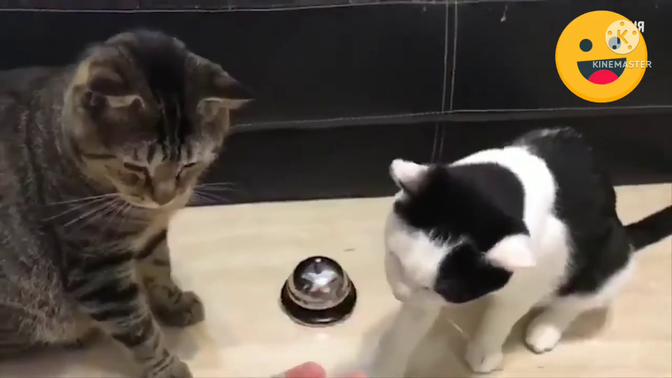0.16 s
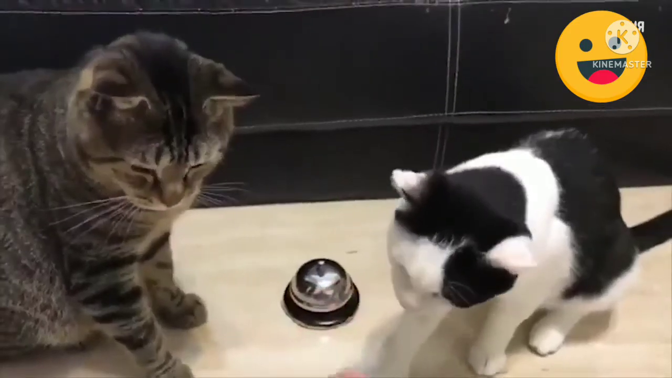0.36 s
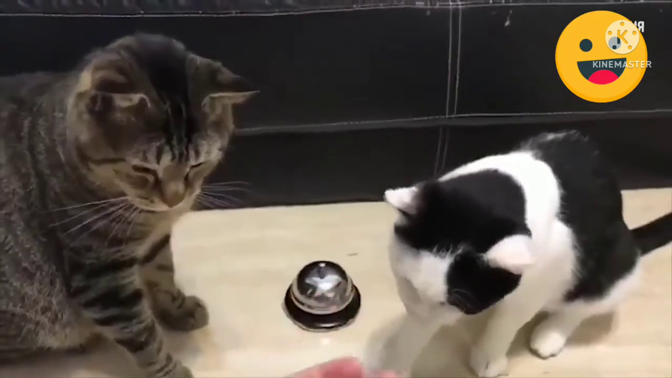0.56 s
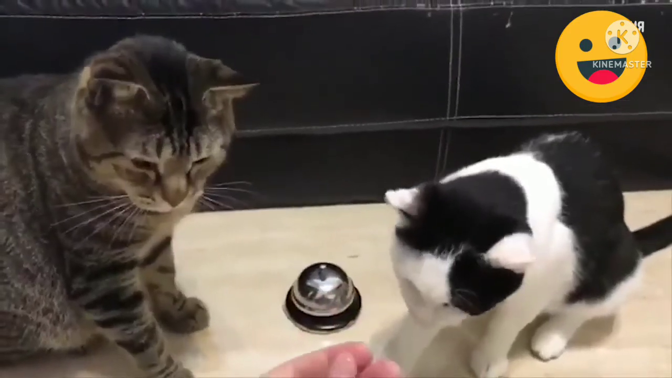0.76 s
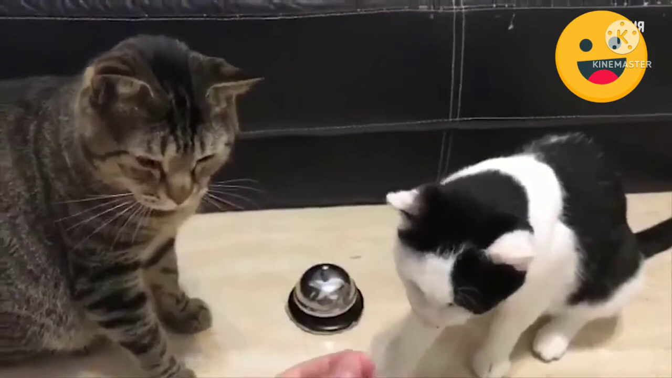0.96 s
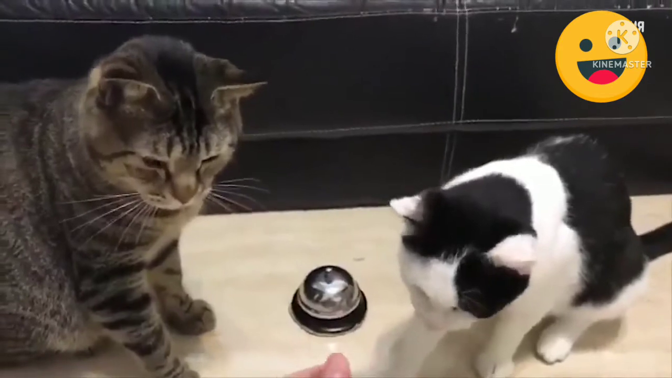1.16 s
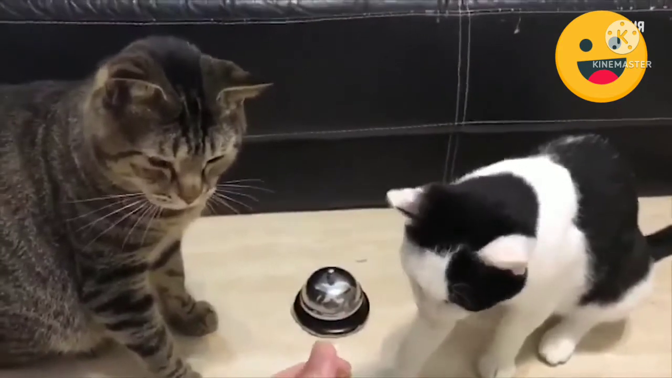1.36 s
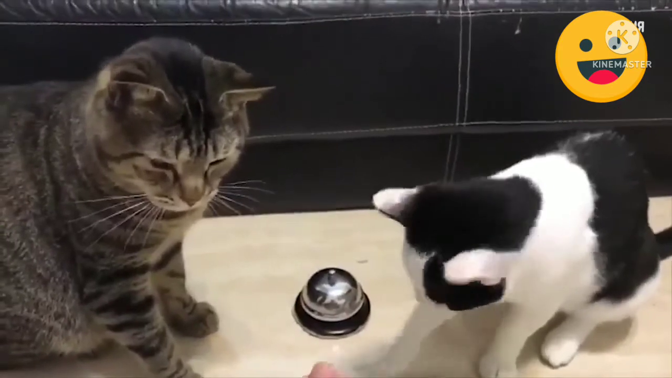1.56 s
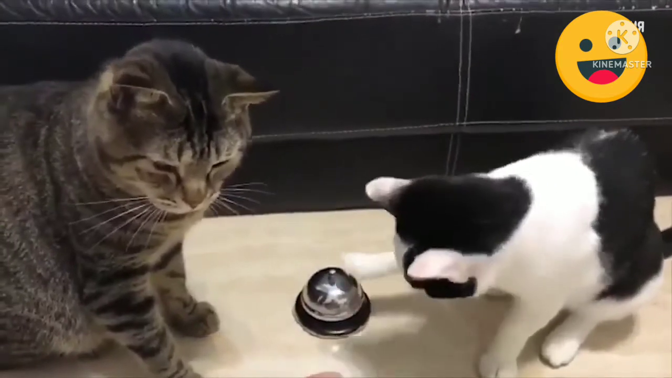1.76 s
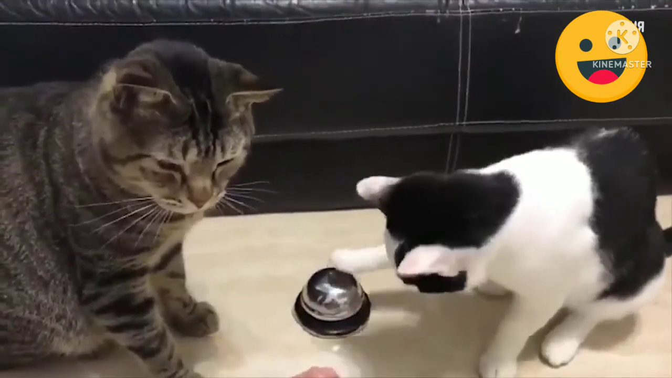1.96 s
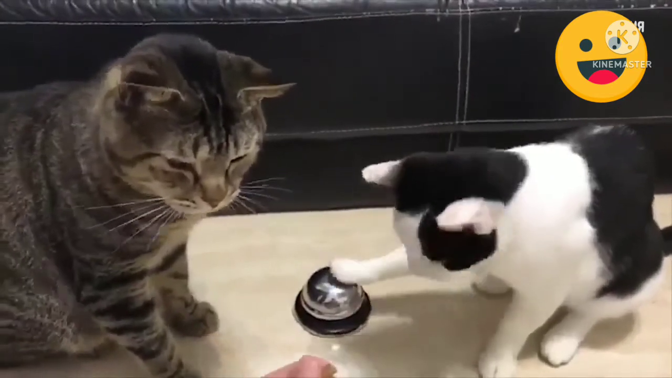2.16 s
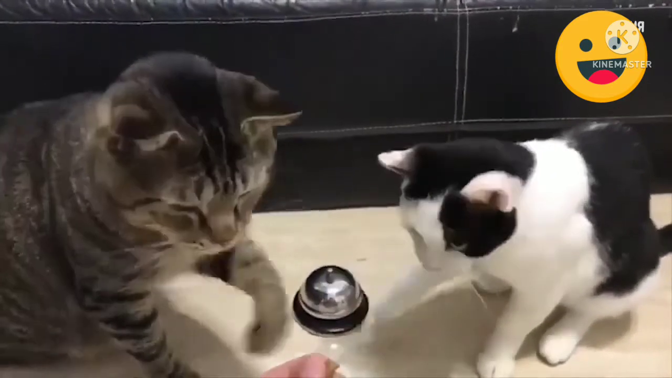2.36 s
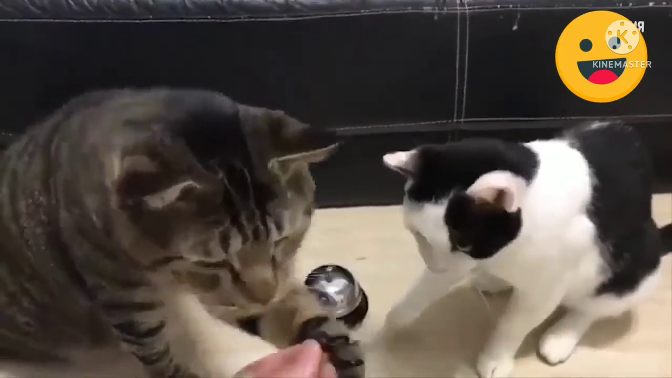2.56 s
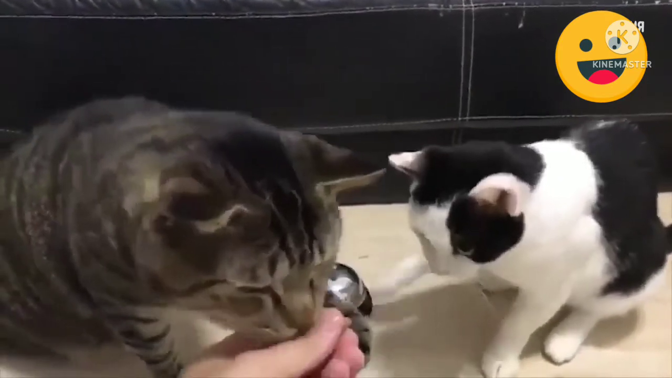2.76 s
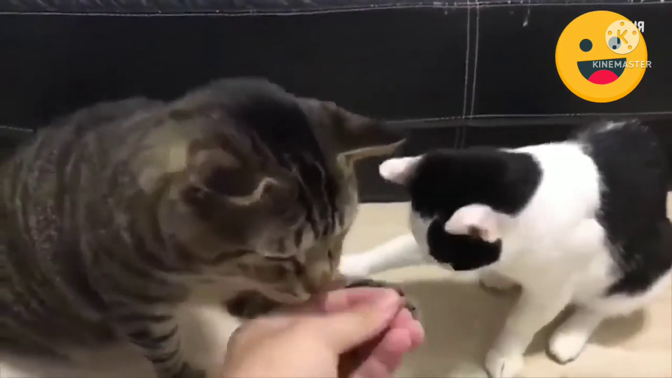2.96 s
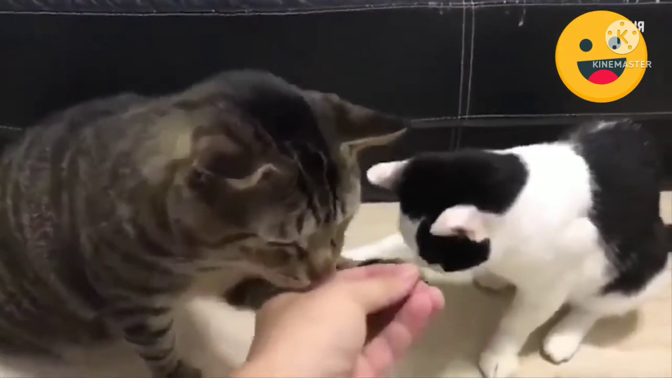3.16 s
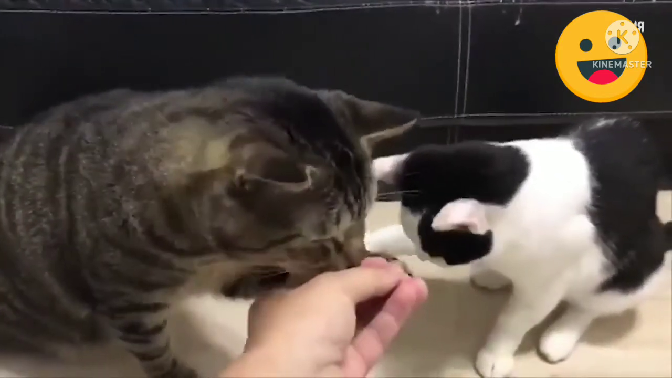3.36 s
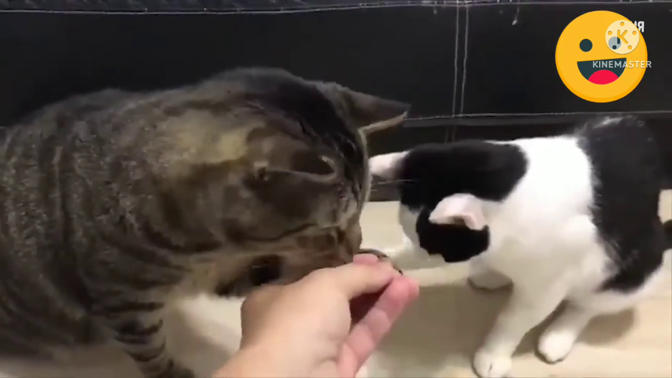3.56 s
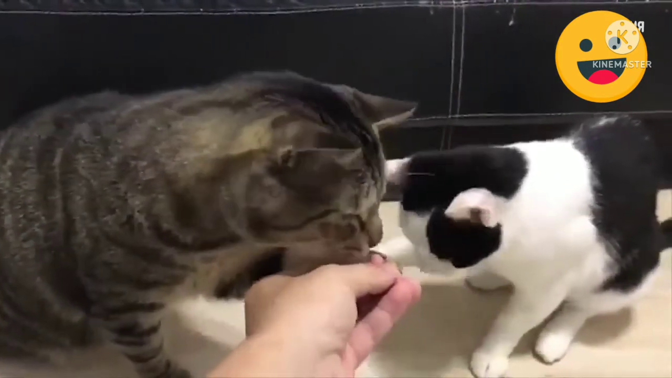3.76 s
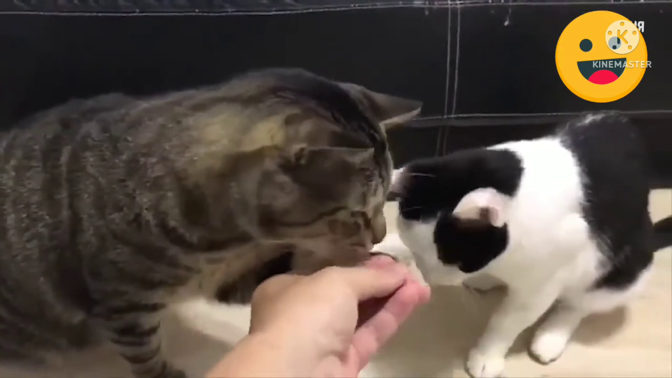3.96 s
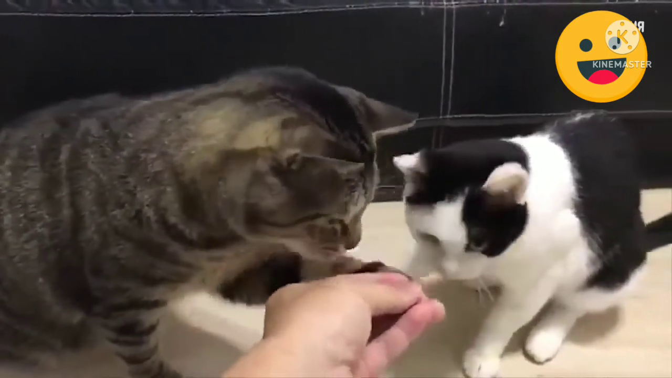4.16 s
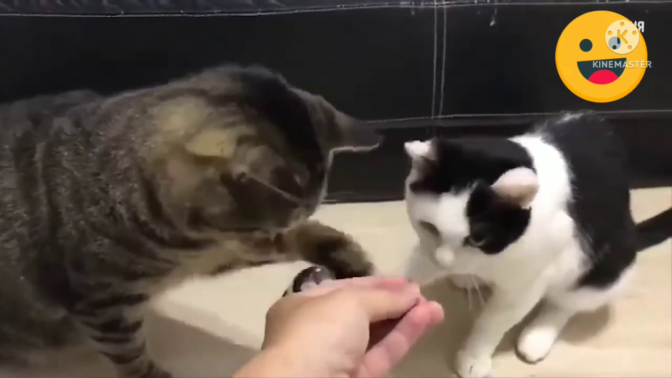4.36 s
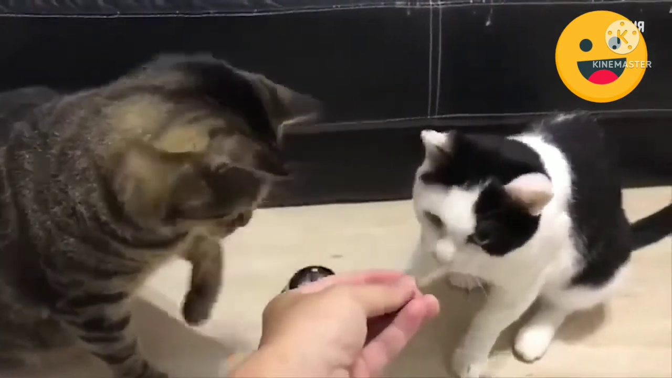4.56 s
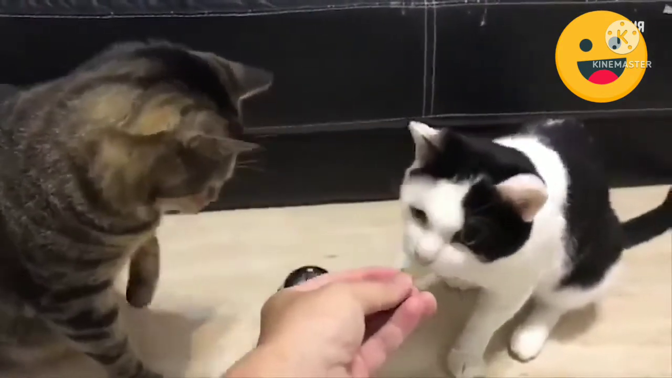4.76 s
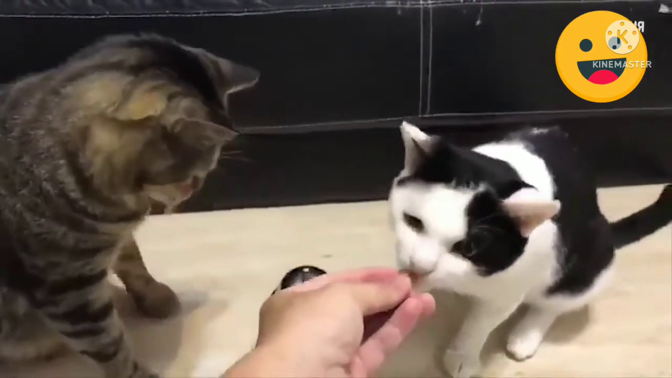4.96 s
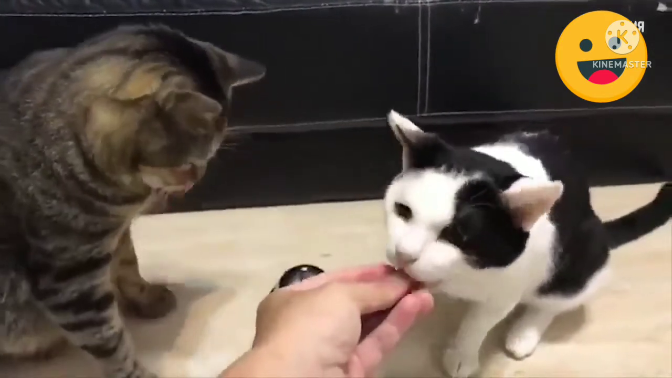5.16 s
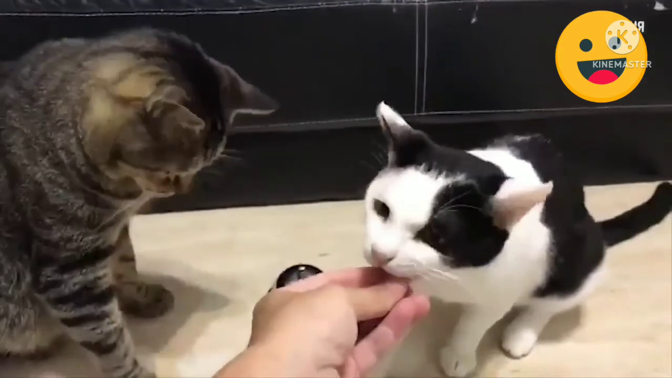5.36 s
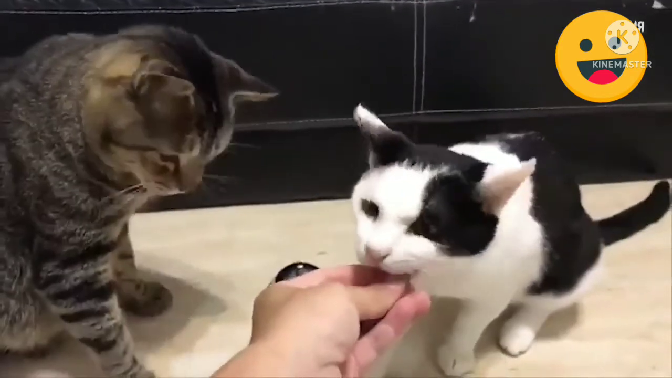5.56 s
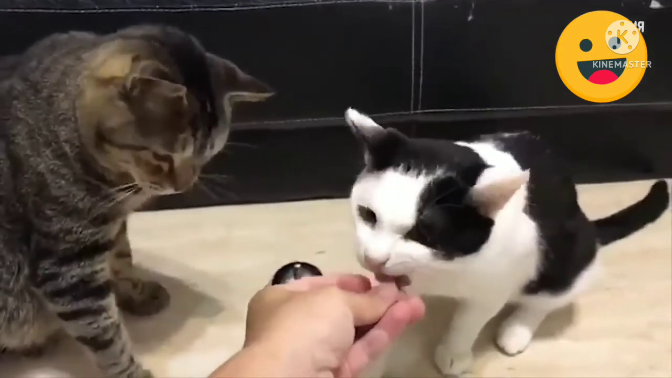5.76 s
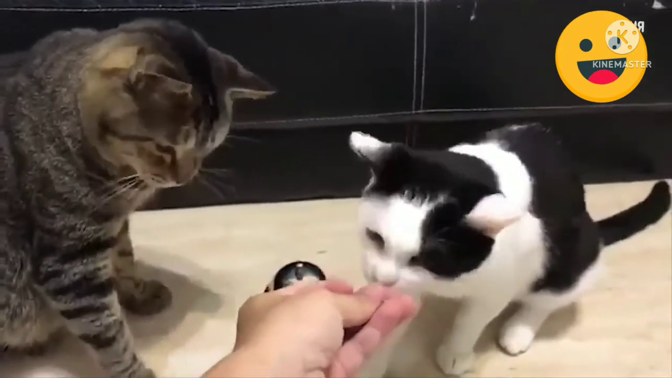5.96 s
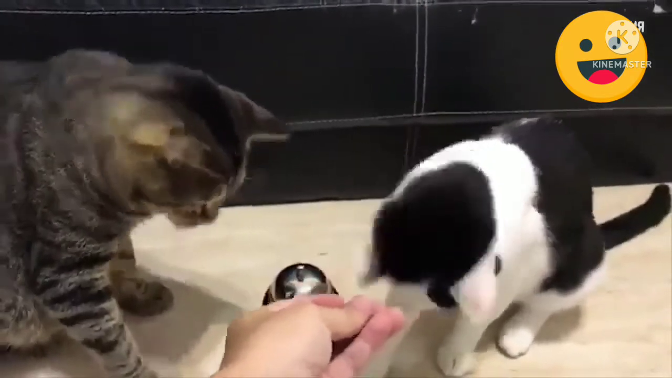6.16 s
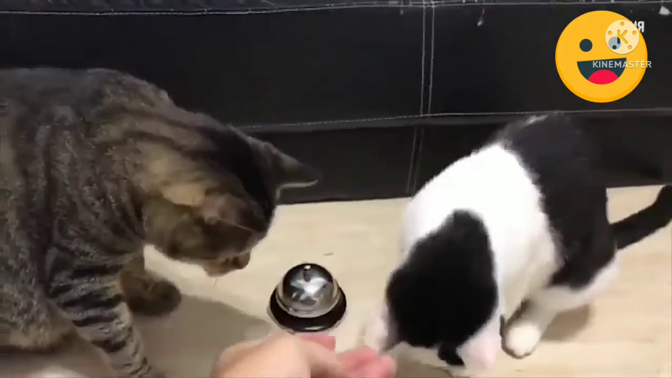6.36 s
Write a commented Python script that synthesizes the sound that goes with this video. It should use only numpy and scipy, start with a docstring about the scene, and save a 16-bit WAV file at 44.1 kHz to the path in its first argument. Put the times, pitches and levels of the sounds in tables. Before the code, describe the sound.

A small metal desk bell is struck three times in a quiet room, ringing brightly, with faint claw ticks and finally bouncing kibble.

```python
"""A steel desk bell on a wooden floor in a quiet room, pawed in turn by two cats: damped sine modes in close
pairs that beat. It hums from an earlier blow, then is struck three times, each with a noisy clank. Claws and
lips tick in short band-limited noise puffs, and the clapper touching the dome adds a few narrow, pitched ticks;
fur rustles as lumpy bright noise. At the end dry kibble bounces on the boards: noise crackles over short sine
thuds. Noise echoes form the room, shaped noise and thin tones its background."""
import sys
import numpy as np
from scipy import signal
from scipy.fft import rfft, irfft, next_fast_len
from scipy.io import wavfile
from scipy.ndimage import uniform_filter1d

SR = 44100
rng = np.random.default_rng(int(sys.argv[2]) if len(sys.argv) > 2 else 0)


def transcribe(signal):
    """Save signal, clipped to [-1, 1], as a 16-bit WAV file at the path in sys.argv[1]."""
    frames = np.atleast_2d(signal).T
    limited = np.clip(frames, -1, 1)
    pcm = np.round(limited * 32767).astype(np.int16)
    wavfile.write(sys.argv[1], SR, pcm)


def to_linear_factor(level_db):
    """Convert decibel levels (scalar or array-like) to linear amplitude factors."""
    exponent = np.asarray(level_db, float) / 20
    return 10 ** exponent


N = 286429  # samples


def rms_one(x):
    """Scale to rms 1."""
    return x / np.sqrt(np.mean(x ** 2) + 1e-20)


def coloured(spectrum, tilt_db_per_oct=0):
    """Noise of rms 1 with the given spectrum, tilted about 3 kHz."""
    hz, level_db = np.transpose(spectrum)
    size = next_fast_len(N, real=True)
    grid_hz = np.arange(size // 2 + 1) * SR / size + 1  # +1 keeps the log finite
    tilted_db = level_db + tilt_db_per_oct * np.log2(hz / 3000)
    grid_db = np.interp(np.log(grid_hz), np.log(hz), tilted_db)
    white = rfft(rng.standard_normal(size))
    return rms_one(irfft(white * to_linear_factor(grid_db), size)[:N])


def burst(start_s, hold_ms, t60_s):
    """Envelope: sudden start, short hold, exponential fall."""
    age_s = np.arange(N) / SR - start_s
    return (age_s >= 0) * to_linear_factor(-60 * np.clip(age_s - hold_ms / 1000, 0, 1) / t60_s)


# blows of the clapper: start_s, clank_db, tilt_db_per_oct,
# low_beat_turns, mid_beat_turns (where the beats of the 1.1 and 3 kHz pairs start)
BLOWS = [(2.058, -21.5, 0.5, 0.38, -.25), (3.17, -21, -0.4, .13, -0.31), (4.0331, -24.5, -0.1, -0.3, 0.54)]
# dome modes, the five longest first: mode_hz
MODE_HZ = [1122.6, 1161.5, 3018.7, 3041.7, 5607.8, 8785.5, 8791, 13187.5, 13183.5, 10622, 8095, 4474, 4190,
           9034, 9235, 9918, 11771, 12810, 13415, 12175, 12990, 14085, 8646, 10620, 13189]
# ring of each mode: t60_s, outset_db (still ringing), peak1_db, peak2_db, peak3_db (per blow)
MODE_RING = [(10, -65, -59, -59, -54.5), (9.9, -69.5, -57.5, -54.5, -59.5), (5.88, -78.5, -52, -41.5, -47),
             (4.98, -64, -38.5, -39.5, -44), (1.85, -87, -26, -24, -25.5), (0.63, -99, -24.5, -24.5, -27.5),
             (.25, -99, -29, -43.5, -52.5), (0.61, -99, -41.5, -43, -43), (.12, -99, -22, -42.5, -34),
             (0.38, -99, -44, -44.5, -43.5), (.07, -99, -62, -18.5, -57), (0.14, -99, -41.5, -45.5, -43.5),
             (.2, -99, -50, -47.5, -47), (0.12, -99, -39, -33, -41), (.12, -99, -37.5, -39, -31),
             (0.17, -99, -35, -47.5, -35.5), (0.14, -99, -32, -35, -50.5), (.11, -99, -41.5, -40.5, -45.5),
             (.08, -99, -38, -45.5, -39.5), (.07, -99, -42, -45.5, -51), (0.089, -99, -37.5, -42, -45),
             (0.0503, -99, -44.5, -39, -44), (.1, -99, -41.5, -42.5, -42.5), (1.1, -99, -65.5, -60, -70),
             (1.2, -99, -68.5, -63, -77)]
# level swells and dips of the first five modes as bodies move round the bell, one list per mode:
# centre_s, width_s, change_db
WAVERS = [
    [(2.2, .08, -2.5), (2.8, .1, -1.5), (3.4, .15, 3.5), (1.8, 0.074, -18), (3.8, 0.084, 7.5),
     (3.99, .1, -14), (4.15, 0.26, -10.5), (4.45, .3, -3.5), (5.2, 0.65, 2.5)],
    [(2.1, 0.15, -4), (2.5, 0.091, -1), (3.806, 0.72, 6.5), (4.9, .3, -2.5)],
    [(2.54, .18, 5.5), (4.6, .12, -4), (3.2, 0.11, -1), (3.6, .1, 2), (4.2, 0.23, 2)],
    [(2.12, 0.12, -3.5), (2.63, 0.092, -3.5), (3.2, 0.066, -15.5), (3.42, 0.078, -3), (3.6, 0.096, 3),
     (4.14, .15, -0.5), (3.9, 0.091, 4)],
    [(2.63, .15, -1.5), (3.1, 0.24, 5.5), (3.2, .1, -0.5), (3.7, 0.73, 3.5), (4.28, 0.29, -3.5),
     (4.97, 0.18, -3.5)],
]


def dome(rise_cycles):
    """Every blow restarts each mode; the sound builds over some cycles as first echoes arrive."""
    outset = (0, 0.41, 0.41)  # start_s, low_beat_turns, mid_beat_turns of the ring already going
    blows = [(start_s, *beat_turns) for start_s, _, _, *beat_turns in BLOWS]
    starts_s, low_beat_turns, mid_beat_turns = np.transpose([outset] + blows)
    t_s, out = np.arange(N) / SR, np.zeros(N)
    blow = np.clip(np.searchsorted(starts_s, t_s, side="right") - 1, 0, None)
    age_s = t_s - starts_s[blow]
    # the lower mode of a pair lags
    lag_turns = {MODE_HZ[0]: low_beat_turns[blow], MODE_HZ[2]: mid_beat_turns[blow]}
    wavers = dict(zip(MODE_HZ, WAVERS))
    for hz, (t60_s, *peak_db) in zip(MODE_HZ, MODE_RING):
        level_db = np.array(peak_db)[blow] - 60 * age_s / t60_s
        for centre_s, width_s, change_db in wavers.get(hz, []):
            level_db += change_db * np.exp(-(2 * (t_s - centre_s) / width_s) ** 2)
        if hz == MODE_HZ[5]:  # the 8.8 kHz mode throbs 8 times a second as it fades
            level_db += 2.1 * np.cos(2 * np.pi * 8.0 * (age_s - .03))
        rise = 1 - np.exp(-age_s * hz / rise_cycles) * (blow > 0)  # low modes speak later
        turns = hz * age_s - lag_turns.get(hz, 0)
        out += to_linear_factor(level_db) * rise * np.sin(2 * np.pi * turns)
    return out


# room noise spectrum: freq_hz, density_db (per Hz, relative)
HUSH = [(22, -35), (36, -4.5), (50, 7.5), (65, -0.5), (85, 3.5), (135, -7.5), (270, -6.5), (469, -17.5),
        (900, -14), (1140, -10), (1400, -17.5), (2210, -24.5), (3350, -26), (4930, -37.5), (11600, -48),
        (13800, -41), (15000, -49)]
# mains hum and faint thin tones: freq_hz, level_db
WHINES = [(51, -72), (8785, -90.5), (10622, -90), (13187, -98.5)]


def background():
    """Low rumble and air hiss as shaped noise, plus a few barely heard sine tones."""
    t_s = np.arange(N) / SR
    tones = sum(to_linear_factor(level_db) * np.sin(2 * np.pi * hz * t_s) for hz, level_db in WHINES)
    return to_linear_factor(-63.5) * coloured(HUSH) + tones


# fur and paws brushing: start_s, length_s, level_db
STROKES = [(0, 2.55, -81), (.6, .05, -86), (.93, .03, -76), (2.2, 0.2, -74.5), (2.417, 0.063, -68.5),
           (3.26, 0.26, -69.5), (3.39, .06, -63), (3.49, .08, -62.5), (4.97, 1.6, -82), (5.135, .04, -77),
           (5.25, .04, -76), (5.68, .07, -79)]


def stroke_level():
    """Each stroke fades in, holds and fades out; their powers add."""
    rise_db_per_s, fall_db_per_s = 302.5, 401
    t_s, power = np.arange(N) / SR, 0
    for start_s, length_s, level_db in STROKES:
        rise_db = rise_db_per_s * np.clip(start_s - t_s, 0, 1)
        fall_db = fall_db_per_s * np.clip(t_s - start_s - length_s, 0, 1)
        power = power + to_linear_factor(level_db - rise_db - fall_db) ** 2
    return np.sqrt(power)


# fur friction spectrum: freq_hz, density_db (per Hz, relative)
FUR = [(1500, -17), (3000, 0), (4500, -2), (5500, -4), (7000, -16), (8200, -1.5), (10000, -5), (12500, -9),
       (13800, -12.5), (14500, -32)]


def rustle(patchy_db):
    """Soft bright friction that comes in lumps: noise whose level wanders slowly in dB."""
    lumps = rms_one(uniform_filter1d(rng.standard_normal(N), size=600))
    return stroke_level() * to_linear_factor(patchy_db * lumps) * coloured(FUR)


def faint_ticks():
    """Lesser ticks at random times (start_s, peak_db, centre_hz, width_oct), kept while a stroke holds."""
    rate_per_s, loudest_db, spread_db = 2.9, -61, 6.0
    when, size, pitch = rng.random((60, 3)).T
    starts_s = np.cumsum(-np.log(1 - when)) / rate_per_s
    rows = []
    for start_s, z, p in zip(starts_s, size, pitch):
        moving = any(a_s < start_s < a_s + length_s for a_s, length_s, _ in STROKES)
        if moving and start_s < N / SR - .1:
            rows.append((start_s, loudest_db + spread_db * (z - 1), 2500 * 2 ** (1.5 * p), .9))
    return rows


# ticks that stand out, from claws and lips, plus a few narrow pitched ones where the clapper touches the dome
# after a blow (near 2.2, 3.4 and 4.4 s): start_s, peak_db, centre_hz, width_oct (raised to 0.1 if less)
TICKS = [(0.011, -48, 5150, 0.74), (0.2484, -44, 2600, 1.1), (.266, -53, 4500, 2),
         (0.3062, -34.5, 6450, 2.9), (0.313, -42, 7600, 0.8), (0.476, -51, 6400, 0.72),
         (0.5624, -55.5, 5560, 0.49), (0.779, -60, 5540, 0.47), (0.7892, -47, 2230, 0.65),
         (0.911, -57, 7000, 0.84), (1.2415, -54.5, 3000, 2.4), (1.473, -63, 4020, 1.6),
         (1.5914, -59, 2790, 0.54), (1.882, -59, 4230, 1.1), (1.943, -61, 4170, 1.1),
         (2.212, -50, 4440, 0.17), (2.213, -51.5, 1370, 0.67), (2.216, -32.5, 8770, 0.086),
         (2.449, -51.5, 345, 0.75), (3.379, -50.5, 4200, 0.34), (3.421, -36, 5560, 0.078),
         (3.507, -57, 4470, 0.26), (4.422, -60, 5500, 0.086), (5.151, -54, 7000, 0.83),
         (5.27, -51, 7460, 1.64), (5.7317, -51.5, 2386, 0.33), (5.744, -68, 3000, 0.9),
         (5.7603, -52, 2583, .9), (6.157, -55.5, 3750, .6)]


def ticks():
    """Each tick is a short puff of noise in one resonance."""
    out, age_s = np.zeros(N), np.arange(4096) / SR
    # the paw meets the plunger before each blow, the clapper knocks back after it
    press = [(start_s - .0074, db - 14.5, 4500, 1.8, 6.0) for start_s, db, *_ in BLOWS]
    rebound = [(start_s + .021, db - 12, 4270, .3, 12.0) for start_s, db, *_ in BLOWS]
    # length: 4 ms and 3 cycles of the centre
    taps = [(*row, 4.0 + 1000 * 3.0 / row[2]) for row in TICKS + faint_ticks()]
    for start_s, peak_db, centre_hz, width_oct, length_ms in press + rebound + taps:
        hold_s, t60_s = length_ms / 2000, 0.00195 + length_ms / 1200
        puff = rng.standard_normal(4096) * to_linear_factor(-60 * np.clip(age_s - hold_s, 0, 1) / t60_s)
        edge = 2 ** (max(width_oct, .1) / 2)
        band_hz = [centre_hz / edge, min(centre_hz * edge, 11500)]
        puff = signal.sosfilt(signal.butter(2, band_hz, "band", fs=SR, output="sos"), puff)
        at = round(start_s * SR)
        out[at:at + 4096] += to_linear_factor(peak_db) * puff / np.abs(puff).max()
    return out


# spectrum of plunger, clapper and base: freq_hz, density_db (per Hz, relative)
CLANK = [(150, -29.5), (400, -17), (800, -28.5), (1300, -7), (2200, -35), (4400, -19), (6300, -11.5),
         (7300, -17.5), (9500, 4), (11200, -9.5), (13500, 8), (14300, -18), (15500, -41)]


def clank(chatter_db):
    """The plunger scrapes, a sharp crack, then loose parts chatter and countless short high modes die."""
    out = 0
    chatter = to_linear_factor(chatter_db * rms_one(uniform_filter1d(rng.standard_normal(N), size=90)))
    for start_s, level_db, tilt_db_per_oct, *_ in BLOWS:
        scrape = to_linear_factor(-13.5) * burst(start_s - .002, 3.5, .002)
        crack = burst(start_s + 0.00055, 1.124, .01)
        rattle = to_linear_factor(-11.5) * chatter * burst(start_s, 20.0, 0.086)
        envelope = to_linear_factor(level_db) * (scrape + crack + rattle)
        out = out + envelope * coloured(CLANK, tilt_db_per_oct)
    return out


# kibble hitting the boards: start_s, level_db, hold_ms, tilt_db_per_oct, thud_db (over the crackle)
BOUNCES = [(6.187, -28, 3.3, -0.34, -7.5), (6.2407, -34.5, 3.9, 6.5, -10.5), (6.334, -37, 4, 1.1, -10.5),
           (6.405, -49, 3.5, 0, -25), (6.419, -53, 10.2, -2.5, -10)]
# kibble crackle spectrum: freq_hz, density_db (per Hz, relative)
KIBBLE = [(120, -41), (200, -13), (520, -7), (2160, -8), (3220, -1.5), (4370, -1.5), (5530, -9.5),
          (6160, -6), (7120, -11.5), (7790, -17), (11200, -19), (14100, -37.5), (14900, -43.5)]


def kibble(thud_hz):
    """Each bounce is a dry crackle over a short thud; its many tiny echoes smear into an even wash."""
    out, t_s = 0, np.arange(N) / SR
    for start_s, level_db, hold_ms, tilt_db_per_oct, thud_db in BOUNCES:
        crackle = burst(start_s, hold_ms, 0.0063) * coloured(KIBBLE, tilt_db_per_oct)
        thud_tone = np.sin(2 * np.pi * thud_hz * (t_s - start_s))
        thud = to_linear_factor(thud_db) * burst(start_s, 0, 0.029) * thud_tone
        wash_level = to_linear_factor(-19.5) * burst(start_s + 0.0031, 5.4, 0.36)
        wash = wash_level * coloured(KIBBLE, tilt_db_per_oct - 0.5)
        out = out + to_linear_factor(level_db) * (crackle + thud + wash)
    return out


# echo decay: freq_hz, t60_s
ROOM = [(300, 0.14), (1500, 0.48), (4000, 0.46), (8000, 0.3), (14000, .2)]


def room(x, rise_ms, wall_hz):
    """Diffuse echoes: octave bands of noise, each dying at its own rate, fading in over a few samples."""
    age_s, tail = np.arange(SR // 2) / SR, 0
    hz, t60_s = np.transpose(ROOM)
    for low_hz in 110 * 2 ** np.arange(7):
        band = signal.butter(2, [low_hz, 2 * low_hz], "band", fs=SR, output="sos")
        band_t60_s = np.interp(np.log(1.95 * low_hz), np.log(hz), t60_s)
        noise = signal.sosfilt(band, rng.standard_normal(len(age_s)))
        tail = tail + noise * to_linear_factor(-60 * age_s / band_t60_s)
    tail = signal.lfilter(*signal.butter(2, wall_hz, fs=SR), tail)  # soft furniture swallows the top
    tail = tail * np.clip(age_s * 1000 / rise_ms, 0, 1)
    return signal.fftconvolve(x, tail / np.sqrt(np.sum(tail ** 2)))[:N]


def scene():
    """Clank, ticks and kibble excite the room; dome, rustle and background are added directly."""
    metal, taps, food = clank(chatter_db=4.5), ticks(), kibble(thud_hz=400)
    send = to_linear_factor(-9.0) * metal + to_linear_factor(-8.5) * taps + to_linear_factor(-10) * food
    wet = room(send, rise_ms=1.5, wall_hz=10000)
    ring = dome(rise_cycles=14.0)
    mix = ring + metal + taps + food + wet + rustle(patchy_db=3.0) + background()
    return mix[None]  # one channel


def top_cut(x):
    """Nothing passes above the cut-off."""
    return signal.sosfilt(signal.butter(12, 15060, fs=SR, output="sos"), x)


def record(dry):
    """A steep low-pass cuts the top: 50 dB down from 15.6 kHz."""
    cut = signal.sosfilt(signal.cheby2(10, 50, 15600, fs=SR, output="sos"), dry)
    return top_cut(cut)


dry = scene()
out = record(dry)
transcribe(out)
```